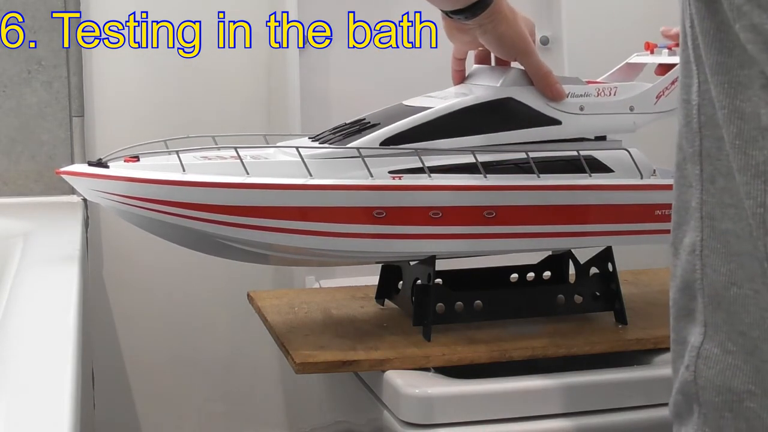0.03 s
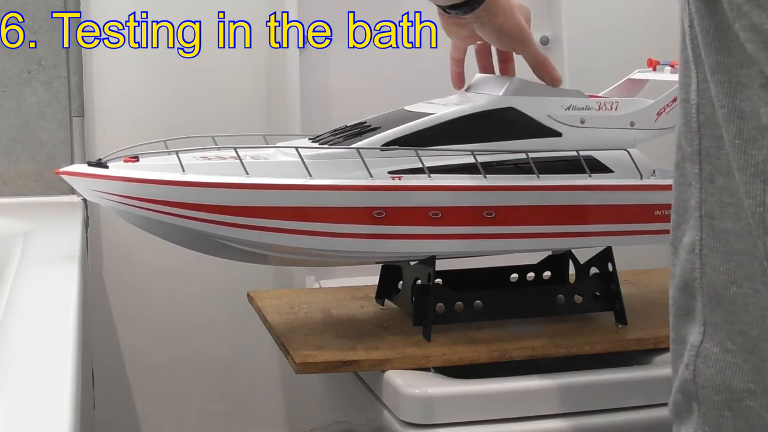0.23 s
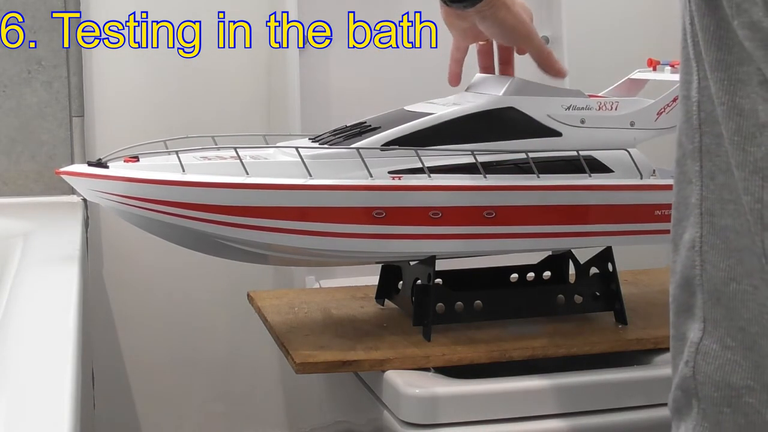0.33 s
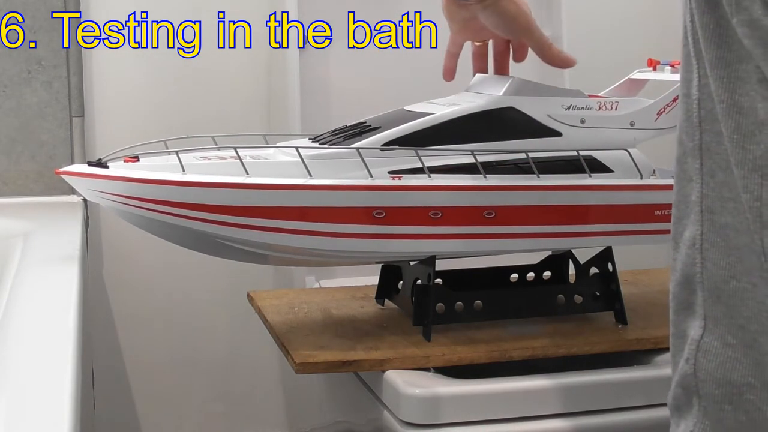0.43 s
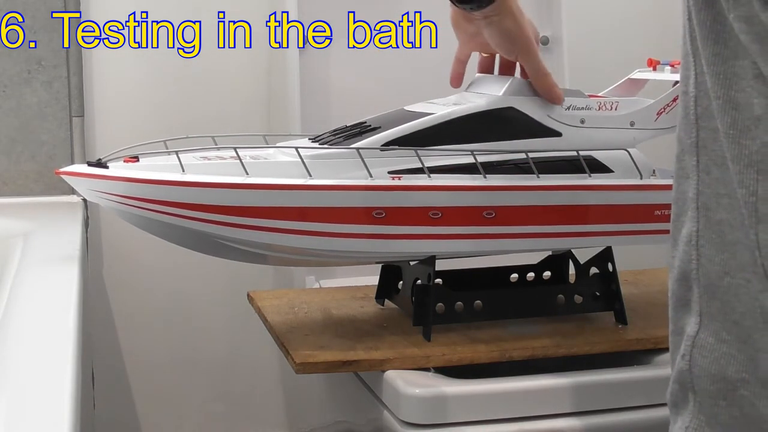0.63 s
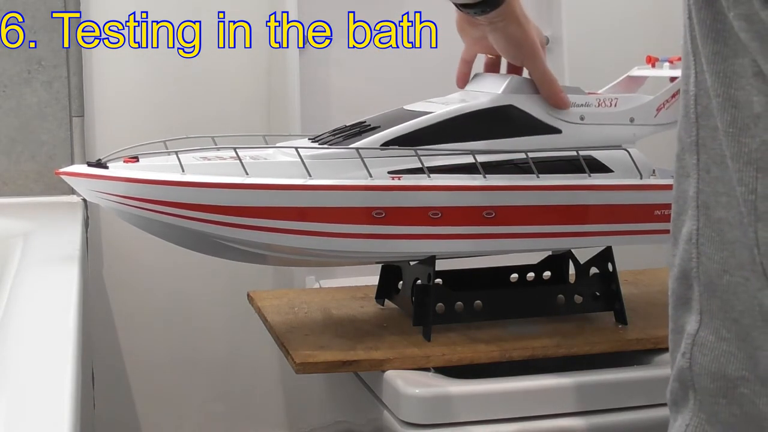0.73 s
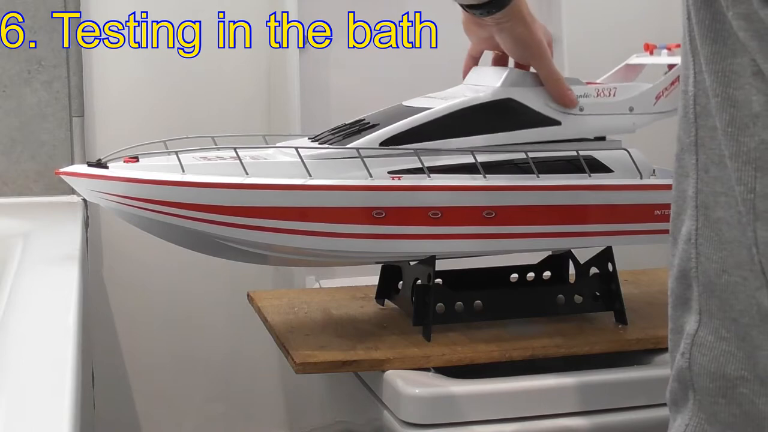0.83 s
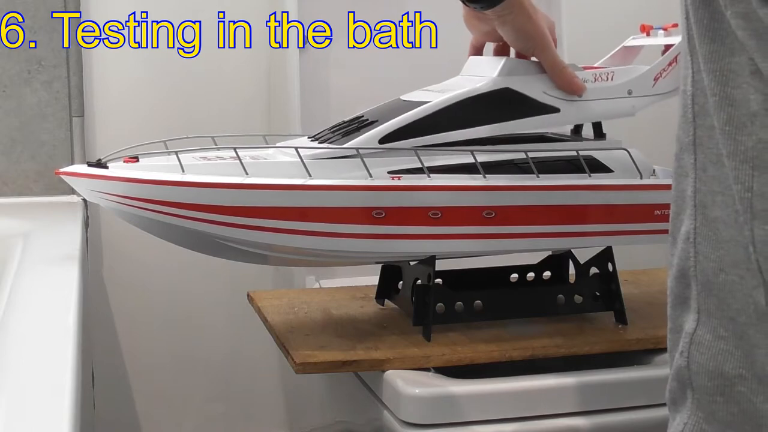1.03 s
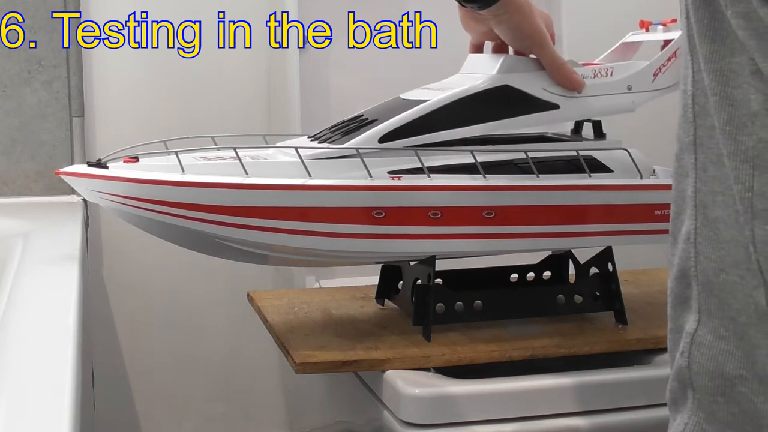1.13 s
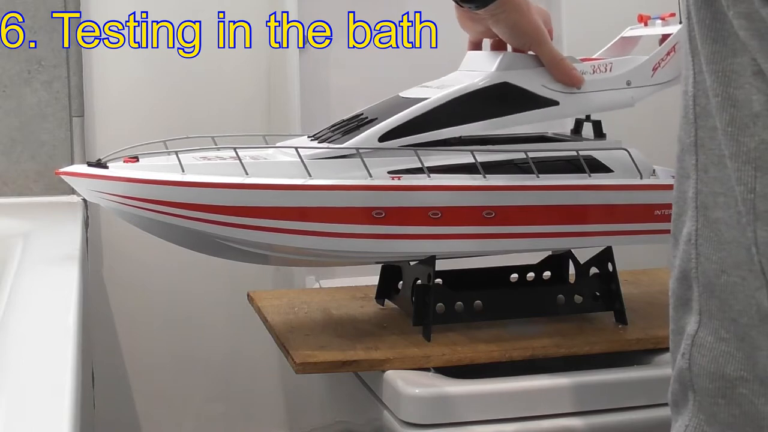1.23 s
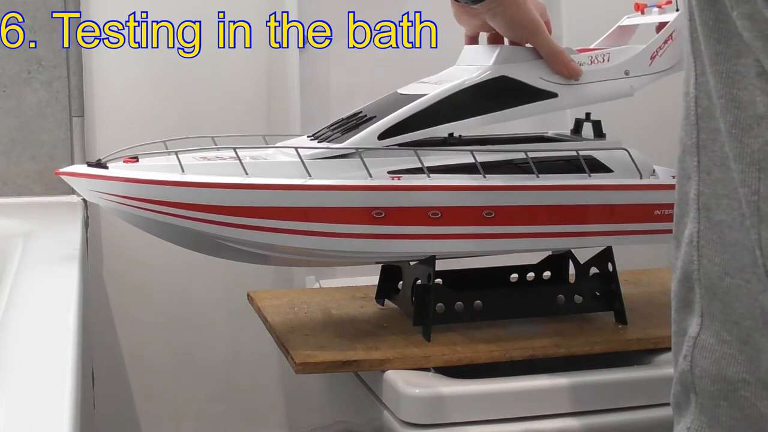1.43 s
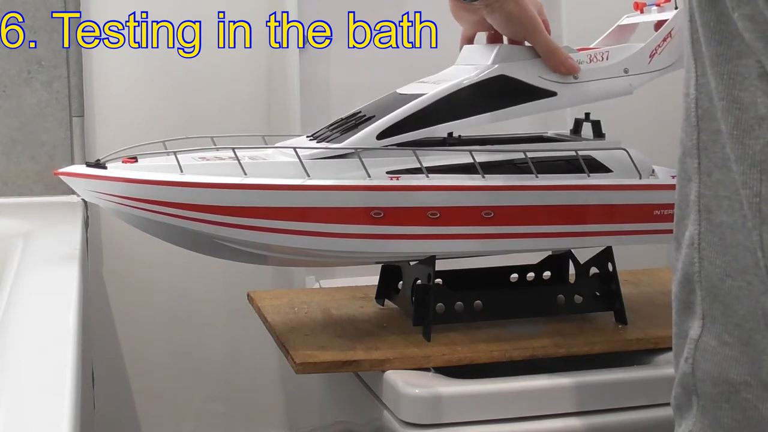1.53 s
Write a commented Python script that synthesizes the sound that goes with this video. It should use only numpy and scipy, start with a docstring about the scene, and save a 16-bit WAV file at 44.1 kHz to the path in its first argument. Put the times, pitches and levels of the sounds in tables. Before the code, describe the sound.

Hollow plastic clunks come from a model boat as its cabin is pulled loose. A soft knock and brief scrape lead to a loud, snapping double clunk around 0.2 to 0.3 seconds. Smaller knocks follow at 0.6 and 0.8 with faint scraping, a thin click at 1.0, and light knocks from 1.3 to 1.6. The shell rings briefly, each blow echoing in a bathroom over a faint hum.

```python
"""In a hard-walled bathroom, a hand works the cabin top loose from a hollow plastic model boat.
The edge scrapes by stick-slip friction, the catch snaps free with a double clunk, and smaller
knocks and clicks follow as the cabin lifts. Each impact drives the thin shell to radiate, and
jolts set the modes of hull and cabin ringing. The walls prolong every blow as reverberation
over a faint hum."""
import sys
import numpy as np
from scipy import signal
from scipy.fft import rfft, irfft, next_fast_len
from scipy.io import wavfile

SR = 44100
rng = np.random.default_rng(int(sys.argv[2]) if len(sys.argv) > 2 else 0)


def unload_audio(sound):
    """Save the sound as a 16-bit wav file, at the path given as the first command line argument."""
    columns = np.transpose(np.atleast_2d(sound))
    # keep every value between -1 and 1, then stretch to whole-number steps
    steps = np.round(np.clip(columns, -1, 1) * 32767)
    wavfile.write(sys.argv[1], SR, steps.astype(np.int16))


N = 70560

# Reverberation time of the room: frequency_hz, t60_s
ROOM_DECAY = [(150, 0.8), (290, 1.23), (700, 1.27), (1840, 1.15), (4500, 0.98), (8000, 0.61), (13000, 0.19)]
# Spectral density of the room's steady noise: frequency_hz, relative_db
AIR_SPECTRUM = [(25, -9), (45, -26), (72, 3.5), (120, -22), (300, 14.5), (800, -14.5), (1600, -9.5),
                (4000, -21), (5500, -27), (8000, -29.5), (12000, -24.5), (15500, -30)]
# Tones of the hum: pitch_hz, level_db
HUM_TONES = [(73, -59.5), (98, -62.5)]
# Normal modes of the two hollow parts: pitch_hz, relative_db, t60_s
HULL_MODES = [(134.8, -14, 0.53), (167.2, -0.5, 0.34), (229.4, 1.5, 1.07), (272.6, -6, 2.5),
              (353.6, -2.5, 1.29), (369.3, -1, 0.98), (400.6, 1.5, 1.45), (628.6, -1.5, 1.07),
              (679, -4.5, 1.1), (818, -8.5, 1.8)]
CABIN_MODES = [(231.4, -4.5, 0.82), (292.9, 2.5, 1.24), (391, -15, 1.8), (471.6, -12, 1.7), (550, -3, .8),
               (766, -9.5, 1.43), (947, -13, 1.5), (1180, -8, 0.35), (1340, -15.5, 0.41)]
# Jolts that excite those modes: start_s, hull_db, cabin_db
BOAT_JOLTS = [(-0.03, -23, -22), (0.218, -0.5, -3.5), (0.605, -19.5, -17.5), (0.790, -18.5, -24),
              (1.265, -34.5, -18.5), (1.440, -31, -22)]
# Impacts of plastic on plastic: start_s, thud_db, knock_db, clack_db, click_db
IMPACTS = [(-0.02, -12.5, -18, -24.5, -25.5), (0.021, -19, -19.5, -38, -34), (0.177, -14, -16, -22, -10),
           (0.213, -8, -11, 1.5, 2), (0.221, 2, 3, -4.5, -11), (0.254, -2.5, 1, 2.5, 3.5),
           (0.265, -5.5, 0, -4, 1.5), (0.328, -7, 2, -16.5, -9), (0.577, -25, -9, -10, -9),
           (0.597, -16.5, -12, -11, -7), (0.619, -5.5, -20.5, -24, -26), (0.777, -18, -13, -9, -9.5),
           (0.790, -11, -15, -14, -21), (0.976, -48, -36, -34, -12.5), (0.985, -44, -47, -29.5, -13.5),
           (1.256, -19, -19.5, -18.5, -14.5), (1.286, -23, -17.5, -16, -36),
           (1.432, -26.5, -22.5, -30, -27), (1.525, -20, -29, -25, -27), (1.578, -12, -19.5, -9.5, -7)]
# Bands of thud, knock, clack and click: centre_hz
IMPACT_BANDS = [170, 700, 2600, 8000]
# Spectral density radiated by the thin shell: frequency_hz, relative_db
SHELL_SPECTRUM = [(25, -32), (70, -10), (112, -12.5), (165, -2), (260, -1), (360, -2), (480, -3.5),
                  (600, 0), (780, -2.5), (1020, -5.5), (1200, -11.5), (1450, -17.5), (2250, -20),
                  (3050, -25.5), (3600, -21), (4200, -21.5), (5000, -30.5), (7700, -22), (10000, -30),
                  (12000, -42.5), (15500, -45)]
# Strokes of the cabin edge: start_s, end_s, peak_db
EDGE_STROKES = [(0.083, 0.205, -33), (0.282, 0.36, -38), (0.643, 0.78, -45), (0.82, 0.937, -49.5),
                (1.393, 1.586, -51)]
# Spectral density of the friction: frequency_hz, relative_db
FRICTION_SPECTRUM = [(200, 6), (700, 10), (1600, -7), (4000, -2), (5200, -5.5), (8000, 2), (11000, -7),
                     (15500, -20)]
# Slips of the catch: start_s, gain_db
CATCH_SLIPS = [(0.1775, -18), (0.2654, -21), (0.9876, -42)]
# Spectral density of a snap: frequency_hz, relative_db
SNAP_SPECTRUM = [(300, -26), (3000, -25), (6000, -7), (8000, 1), (12500, -2.5), (15500, -18)]
# Level balance of the microphone pair: frequency_hz, left_minus_right_db
MIC_BALANCE = [(60, -1.5), (140, -6.5), (240, -4.5), (400, -3.5), (750, 0.9), (1300, 0)]
# Phase between the microphones: frequency_hz, left_lead_rad
MIC_PHASE = [(25, 2.5), (70, 2), (140, 1.08), (260, 0.69), (450, 0.79), (1100, 0.6), (2000, 0.43),
             (3500, 0)]
# Weight of the incoherent sound at the pair: frequency_hz, gain_db
MIC_INCOHERENCE = [(70, -8.5), (200, -7), (400, -13), (750, -7), (1150, -5.5), (1500, -11), (2300, -8.5),
                   (3000, -15), (3800, -16.5), (4400, -47), (7900, -45), (8500, -8), (11000, 0)]


def undb(db):
    """Amplitude ratio of a level in decibels."""
    return 10 ** (np.asarray(db) / 20)


def curve(points, hz):
    """Interpolate (frequency_hz, value) points on a logarithmic frequency axis."""
    hz_points, values = np.array(points, float).T
    return np.interp(np.log(np.maximum(hz, 1)), np.log(hz_points), values)


def minimum_phase(points, size=2048):
    """Causal impulse response of a gain curve, obtained by folding its cepstrum."""
    hz = np.arange(size + 1) * SR / (2 * size)
    cepstrum = irfft(np.log(undb(curve(points, hz))))
    cepstrum[1:size] *= 2
    cepstrum[size + 1:] = 0
    return irfft(np.exp(rfft(cepstrum)))[:size]


def colour(spectrum):
    """A filter of unit energy shapes white noise while conserving its power."""
    response = minimum_phase(spectrum)
    return response / np.linalg.norm(response)


def through(x, response):
    """Linear filtering: convolution in time, cut to the length of x."""
    return signal.fftconvolve(np.atleast_2d(x), np.atleast_2d(response), axes=-1)[:, :x.shape[-1]]


def add(out, x, start_s):
    """Superpose x on out from a start time, which may be negative."""
    i = int(round(start_s * SR))
    x = x[..., max(-i, 0):max(N - i, 0)]
    out[..., max(i, 0):max(i, 0) + x.shape[-1]] += x


def reverberation(bands=9, build_s=0.00067):
    """A diffuse field decays exponentially, treble first, here as two independent noise tails."""
    size = next_fast_len(N + SR // 10)
    t, hz = np.arange(size) / SR, np.arange(size // 2 + 1) * SR / size
    noise = rfft(rng.standard_normal((2, size)))
    centres_hz = np.geomspace(80, 14000, bands)
    tail = np.zeros((2, size))
    for centre_hz, weights in zip(centres_hz, np.eye(bands)):
        band = irfft(noise * curve(list(zip(centres_hz, weights)), hz), size)
        tail += band * np.exp(-np.log(1000) * t / curve(ROOM_DECAY, centre_hz))
    return tail * (1 - np.exp(-t / build_s))


def air_and_hum(air_db=-50.5):
    """Stationary background: the continuous spectrum of room air plus two low spectral lines."""
    t = np.arange(N) / SR
    out = undb(air_db) * through(rng.standard_normal((2, N)), colour(AIR_SPECTRUM))
    for hz, db in HUM_TONES:
        out[0] += undb(db) * np.sqrt(2) * np.sin(2 * np.pi * (hz * t + rng.random()))
    return out


def ringing(modes, jolts, gain_db=-17.5, rise_s=0.011, scatter_db=2):
    """Free vibration: a jolted hollow part sounds as a sum of damped modes, prolonged by the room."""
    out, t = np.zeros(N), np.arange(N + SR // 10) / SR
    waves = np.array([undb(db) * np.exp((2j * np.pi * hz - np.log(1000) / t60_s) * t)
                      for hz, db, t60_s in modes])
    waves *= 1 - np.exp(-t / rise_s)
    for start_s, jolt_db in jolts:
        amplitudes = undb(gain_db + jolt_db + scatter_db * rng.standard_normal(len(modes)))
        phasors = np.exp(2j * np.pi * rng.random(len(modes)))
        add(out, ((amplitudes * phasors) @ waves).imag, start_s)
    return out


def impacts(gain_db=-19.5, contact_decay_s=0.0069, contact_db=1.5, direct_db=-11):
    """Impulsive excitation of shell and room: soft contacts thud, hard ones reach the treble and click."""
    out, shell = np.zeros((2, N)), colour(SHELL_SPECTRUM)
    for start_s, *bands_db in IMPACTS:
        blow = reverberation()
        envelope = np.exp(-np.arange(blow.shape[1]) / SR / contact_decay_s)
        blow += undb(contact_db) * rng.standard_normal(blow.shape) * envelope
        blow[0, 0] += undb(direct_db) * np.sqrt(SR / 1000)  # direct sound: a single impulse
        hardness = minimum_phase(list(zip(IMPACT_BANDS, bands_db)))
        add(out, through(blow, signal.fftconvolve(shell, hardness)), start_s)
    return undb(gain_db) * out


def edge_scrapes(slips_per_s=2000, swell_power=1.5):
    """Stick-slip friction: the edge emits dense random impulses that strengthen as the pull grows."""
    t, force = np.arange(N) / SR, np.zeros(N)
    for start_s, end_s, peak_db in EDGE_STROKES:
        progress = np.clip((t - start_s) / (end_s - start_s), 0, 1)
        force += undb(peak_db) * progress ** swell_power * (t < end_s)
    slips = (rng.random(N) < slips_per_s / SR) * rng.standard_normal(N)
    slips /= np.sqrt(np.mean(slips ** 2))
    friction = through(force * slips, colour(FRICTION_SPECTRUM))
    tail = reverberation()
    return through(friction, tail / np.linalg.norm(tail[0]))


def catch_snaps(decay_s=0.0003, room_db=-20.5):
    """A brief transient has a broad spectrum: the catch slips with a bright crack and a little echo."""
    out = np.zeros((2, N))
    for start_s, gain_db in CATCH_SLIPS:
        snap = undb(room_db) * reverberation()
        envelope = np.exp(-np.arange(snap.shape[1]) / SR / decay_s)
        snap += rng.standard_normal(snap.shape) * envelope
        add(out, undb(gain_db) * through(snap, colour(SNAP_SPECTRUM)), start_s)
    return out


def microphones(field):
    """Partial coherence: each microphone takes shared and incoherent sound at its own level and phase."""
    hz = np.arange(N + 1) * SR / (2 * N)
    side = np.array([[1], [-1]])  # left, right
    shared, incoherent = rfft(field, 2 * N)
    pressure = shared + side * undb(curve(MIC_INCOHERENCE, hz)) * incoherent
    balance = undb(side * curve(MIC_BALANCE, hz) / 2)
    phase_shift = np.exp(0.5j * side * curve(MIC_PHASE, hz))
    return irfft(pressure * balance * phase_shift)[:, :N]


def scene():
    """Superposition: all sources add in one field, with row 0 shared and row 1 incoherent."""
    field = impacts() + catch_snaps() + edge_scrapes() + air_and_hum()
    field[0] += ringing(HULL_MODES, [(start_s, db) for start_s, db, _ in BOAT_JOLTS])
    field[0] += ringing(CABIN_MODES, [(start_s, db) for start_s, _, db in BOAT_JOLTS])
    return microphones(field)


def record(dry):
    """Band limiting: a steep elliptic low-pass filter removes the highest treble."""
    cutoff_hz = 15900
    return signal.sosfilt(signal.ellip(10, 0.2, 80, cutoff_hz, fs=SR, output="sos"), dry)


dry = scene()
out = record(dry)
unload_audio(out)
```